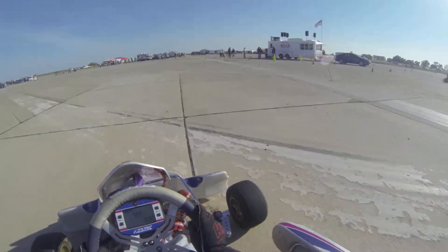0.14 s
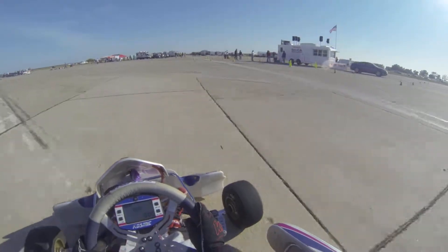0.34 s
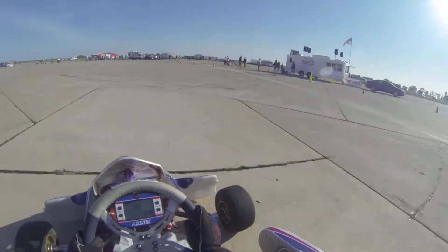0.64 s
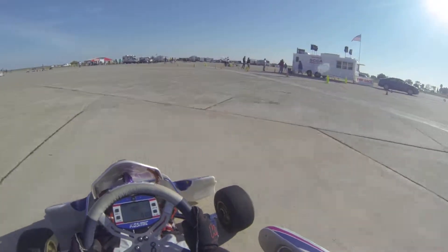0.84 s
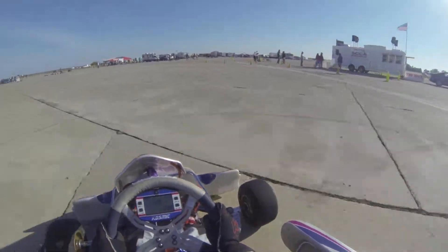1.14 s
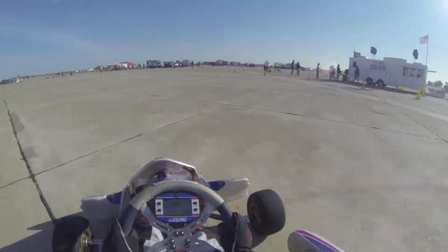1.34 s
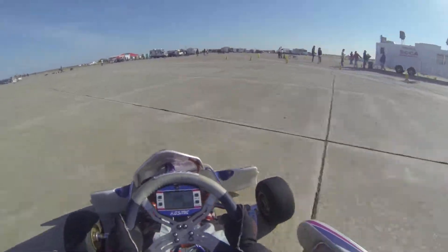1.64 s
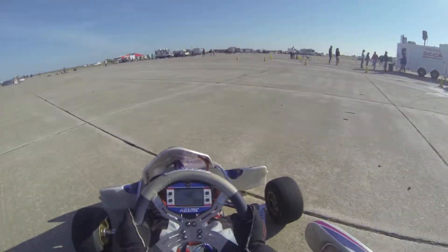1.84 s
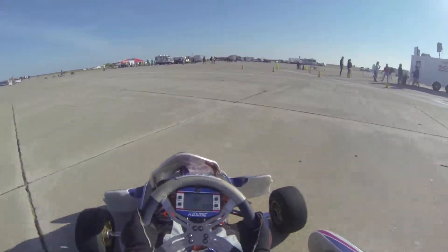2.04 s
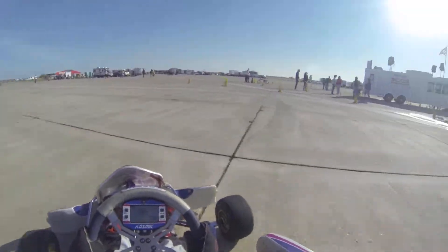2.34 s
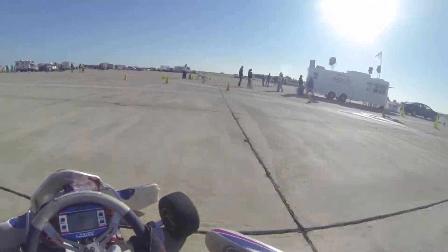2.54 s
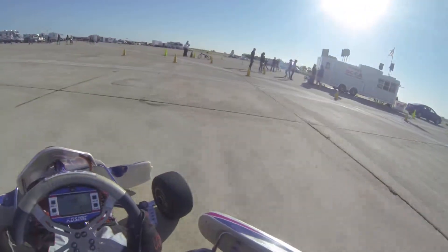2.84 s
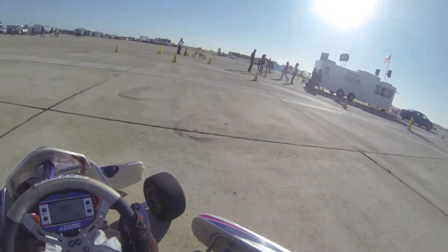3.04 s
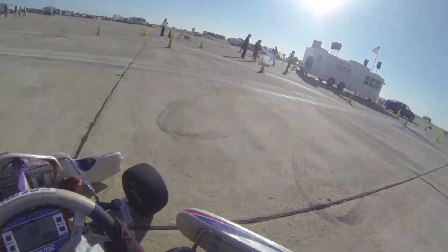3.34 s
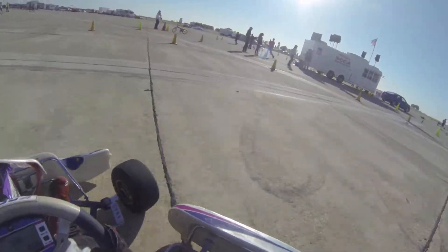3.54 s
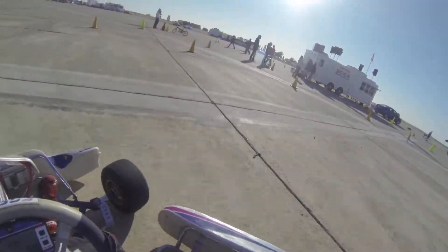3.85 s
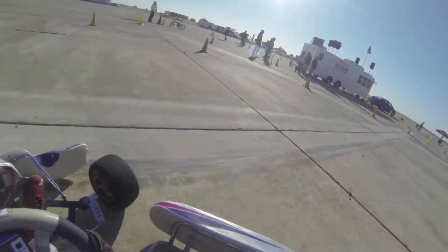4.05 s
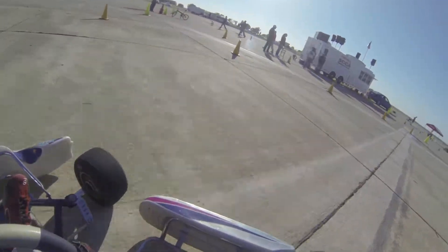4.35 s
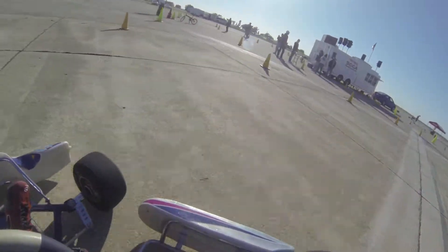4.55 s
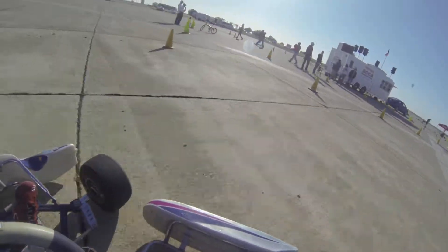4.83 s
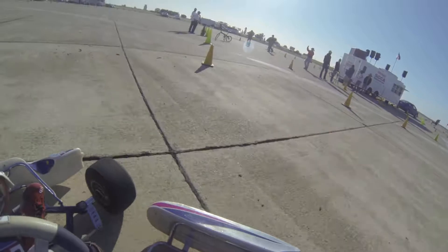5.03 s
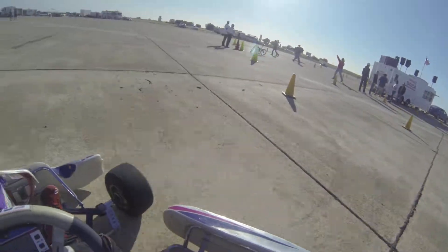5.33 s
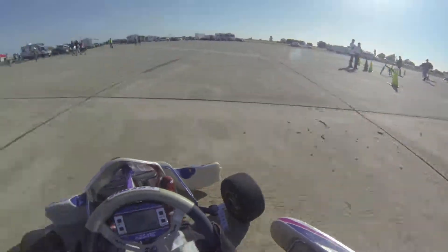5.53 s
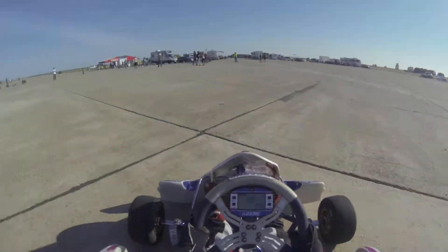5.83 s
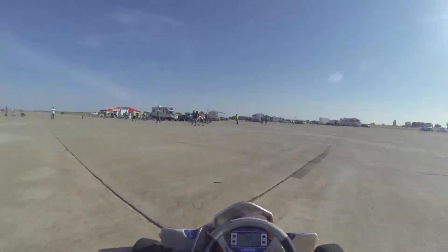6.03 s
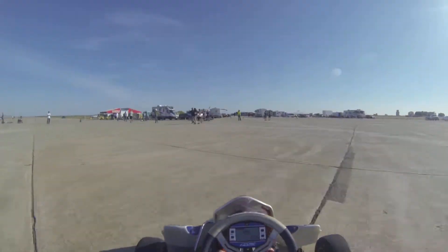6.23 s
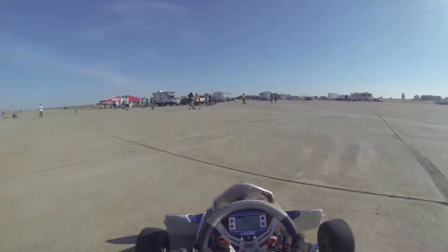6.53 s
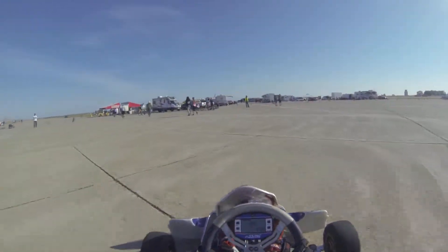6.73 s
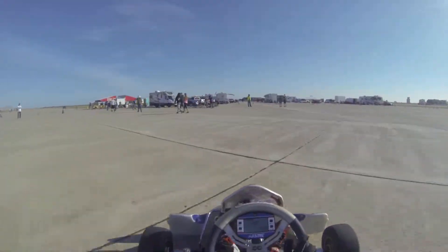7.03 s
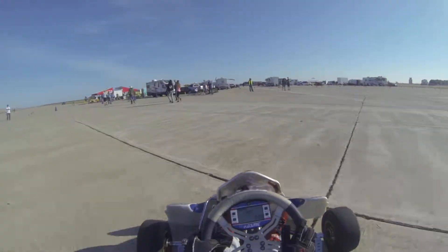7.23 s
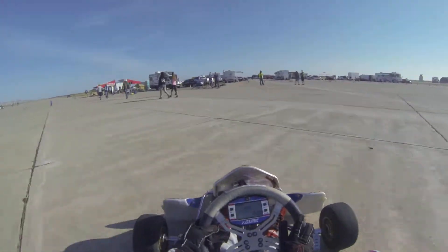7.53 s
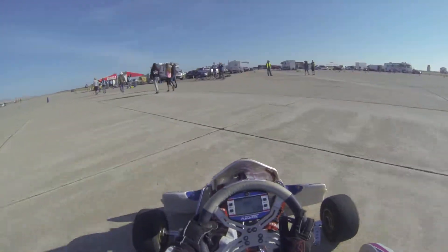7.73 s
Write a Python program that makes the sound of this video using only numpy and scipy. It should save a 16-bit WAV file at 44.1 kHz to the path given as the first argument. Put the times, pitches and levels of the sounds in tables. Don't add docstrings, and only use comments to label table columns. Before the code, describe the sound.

Close onboard sound on open concrete. A small single-cylinder four-stroke kart engine thumps lumpily near idle while chain and valve gear rattle and wind booms around a sealed camera case. Small grit ticks lead to one sharp stone crack past the middle. The throttle then opens into a loud, raspy bark for about a second and a half before easing back to a rattling coast.

```python
import sys
import numpy as np
from scipy import signal
from scipy.fft import rfft, irfft
from scipy.io import wavfile
from scipy.ndimage import uniform_filter1d

SR = 44100
rng = np.random.default_rng(int(sys.argv[2]) if len(sys.argv) > 2 else 0)


def voltage_ratio(decibels):
    exponent = np.asarray(decibels, float) / 20
    return 10 ** exponent


def dump(signal):
    limited = np.clip(np.atleast_2d(signal).T, -1, 1)
    pcm = np.round(limited * 32767).astype(np.int16)
    wavfile.write(sys.argv[1], SR, pcm)


N = 347508

# [t/s, level/dB]
WIND_FACING = [
    (0, 1.5),
    (2.85, 1),
    (3, -5),
    (4.1, -12),
    (4.6, -1),
    (5.2, -9),
    (5.9, -6),
    (6.2, -4.5),
    (7.2, -3),
    (7.88, -0.5),
]
# [t/s, extra buffeting level/dB, extra boom level/dB]
GUSTS = [(.08, 8, 5), (.39, 2, 2.5), (.86, 7, 1), (1.25, 6, 4.5), (1.41, 14.5, 2), (1.55, 6, 2.5),
         (2.06, 7, 0), (2.42, 1, 1.5), (2.55, -3, 3.5), (2.7, -3, 5), (2.86, 5, 1), (4.39, 8, -1.5),
         (4.61, 1, 2), (5.36, 7, 3.5), (5.51, -1, 2), (5.71, 0, 7.5), (6.01, 10, 4.5), (6.21, 13.5, 5.5),
         (6.36, 10, 0), (6.54, 12, -10), (6.74, 15, 2), (6.93, 17, 1), (7.3, 5, 10.5), (7.55, 4.5, 7),
         (7.86, 0, 6)]
# [t/s, dull level/dB, bright level/dB, decay/ms]
GRIT = [(.375, -35, -44, 2), (0.928, -33, -52, 3.5), (1.389, -43, -52, 3), (1.455, -34, -52, 3),
        (4.342, -27, -50, 1.5), (4.423, -36, -49, 1.5), (4.553, -35, -50, 1.5), (4.734, -16, -16.5, 1.2),
        (4.847, -34, -48, 1.5), (5.065, -30, -38, 3), (5.27, -40, -43, 3), (3.09, -42, -43, 4),
        (3.16, -40, -42, 4), (2.76, -42, -40, 4), (2.36, -36, -45, 4), (3.63, -42, -44, 4),
        (5.553, -30, -37, 11), (5.584, -25, -31, 8.8), (5.614, -26, -33, 7.8), (7.311, -24, -50, 2.6),
        (7.336, -29, -51, 5), (7.398, -32, -46, 4.7)]
# [t/s, f/Hz, level/dB, decay/ms]
KNOCKS = [
    (4.733, 1800, -18, .8),
    (4.734, 2950, -11, 1.2),
    (4.734, 3750, -22, 1),
    (7.311, 665, -24, 3),
    (7.311, 1030, -20, 2.2),
    (7.312, 3000, -26, 3.6),
]
# [t/s, extra level/dB, length/s]
LEANS = [
    (0.1, 18, 0.31),
    (0.623, 17, .12),
    (1.803, 16, 0.27),
    (2.208, 14, 0.26),
    (2.82, 13, 0.063),
    (3.548, 19.5, .45),
    (4.55, 17, 0.44),
    (6.08, 8, .1),
    (6.72, 11, 0.14),
    (7.5, 24, .4),
]
# [t/s, level/dB]
CLUTCH_SLIP = [
    (0, -47.5),
    (2, -55),
    (2.6, -47.5),
    (4.5, -40),
    (5.4, -42.5),
    (5.8, -56),
    (7.88, -55),
]
# [t/s, firing rate f/Hz, silencer level/dB]
ENGINE = [(0, 30.3, -29.5), (.46, 29.17, -36.5), (.6, 27.32, -36.5), (1.25, 27.49, -35.5),
          (1.7, 26.3, -39.5), (2., 27.31, -32.5), (2.6, 27.38, -35.5), (3.01, 28.29, -31.5),
          (3.47, 29.28, -30.5), (4.4, 30.61, -29.5), (5.2, 31.17, -30), (5.48, 30.56, -31),
          (5.71, 37.32, -24.5), (5.82, 38.46, -23.5), (6.05, 39.07, -25.5), (6.82, 38.24, -25),
          (7.07, 33.94, -25), (7.4, 32.01, -27)]

# [f/Hz, level/dB]
CHUFF = [(397, 190, 18), (635, 43, 1)]
CHUFF_SLOPE = [(60, -17), (170, -38), (240, -16), (750, -44), (950, 3.5), (2000, -63)]
FRAME = [(1428, 157, 3.5), (1617, 268, -4.5), (2201, 153, -1), (2790, 61, -14.5), (3150, 530, -17),
         (3953, 350, -12), (5150, 176, -28.5), (10000, 280, -31)]
FRAME_SLOPE = [(200, -15), (700, -11.5), (1000, -13.5), (2500, -12.5), (4500, -19.5), (7500, -25.5),
               (10500, -34.5), (15500, -38)]
DRUM = [(3220, 200, 4), (5170, 110, 4), (6750, 300, -4), (9100, 1100, -11), (12000, 900, -25),
        (14200, 400, -33)]
DRUM_SLOPE = [(2000, -50), (4500, -18), (7700, -26), (11000, -34), (15500, -48)]
TAILPIPE = [(620, 110, 0)]
TAILPIPE_SLOPE = [(200, -40), (1500, -40)]
CRACK = [(297, 90, -1.5), (650, 120, -7.5), (1040, 45, -5.5), (1248, 115, -3), (1385, 83, 2), (1500, 59, 7),
         (1694, 110, -1), (2113, 120, 3.5), (3100, 590, -12), (3827, 80, -9)]
CRACK_SLOPE = [(150, -78), (850, -14.5), (1300, -13), (2500, -21), (4500, -28), (9000, -60)]
BARK = [(1470, 310, -1), (1680, 130, -6), (2202, 110, -1), (2980, 280, -14), (3950, 340, -19)]
BARK_SLOPE = [(200, -82), (1000, -15), (1300, -16.5), (2600, -16.5), (4500, -26), (7000, -33), (11700, -43),
              (15500, -57)]
SILENCER = [(72, 200, -8.5), (110.6, 135, -1), (169.8, 16.4, 1), (188.5, 18, 1.5), (405, 81, -4),
            (535, 42, -19), (620, 113, -8), (719.4, 43, -6)]
SILENCER_SLOPE = [(20, -22), (200, -22), (260, -27), (760, -27), (820, -33), (1100, -32), (1500, -40),
                  (3000, -70)]
# [f/Hz, level/dB]
HISS_SLOPE = [(2000, -12.5), (4300, 0), (5800, -7), (7500, -9.5), (11800, -18), (15500, -20)]
# [f/Hz, width/Hz, share removed/0-1]
CASE_DIPS = [(6050, 310, 0.46), (8180, 2700, 0.46), (10400, 1700, 0.32), (13200, 1300, 0.6),
             (14900, 2000, 0.8)]

OPENS_S, OPENING_S, SHUTS_S, SHUTTING_S = 5.42, 0.21, 6.874, 0.49
IDLE_HZ = 27
FIRING_AT_S = 6.1645


def unit(x):
    return x / np.sqrt(np.mean(x ** 2))


def noise():
    return rng.standard_normal(N)


def track(table):
    s, *columns = np.transpose(table)
    return [np.interp(np.arange(N) / SR, s, c) for c in columns]


def body(x, modes, slope, echo_ms=1., echo=0.):
    size = 2 ** 13
    hz = np.arange(size // 2 + 1) * SR / size + 1e-3
    slope_hz, slope_db = np.transpose(slope)
    gain = voltage_ratio(np.interp(np.log(hz), np.log(slope_hz), slope_db))
    for centre, width, db in modes:
        gain = gain + voltage_ratio(db) / (1 + ((hz - centre) / width) ** 2 * 2) ** 2
    cepstrum = irfft(np.log(gain))
    cepstrum[1:size // 2] *= 2
    cepstrum[size // 2 + 1:] = 0
    lag = np.exp(-2j * np.pi * hz * echo_ms / 1000)
    all_pass = (lag - echo) / (1 - echo * lag)
    response = irfft(np.exp(rfft(cepstrum)) * all_pass)
    return unit(signal.oaconvolve(x, response)[:N])


def band(x, lo_hz, hi_hz):
    return unit(signal.sosfilt(signal.butter(2, [lo_hz, hi_hz], "band", fs=SR, output="sos"), x))


def walk(rate):
    k = int(SR / rate)
    held = np.repeat(rng.standard_normal(N // k + 1), k)
    return unit(uniform_filter1d(uniform_filter1d(held, k), k)[:N])


def steady(x):
    return x / np.sqrt(uniform_filter1d(x ** 2, SR // 3))


def swells(s, db, length_s):
    t = np.arange(0, N, 64)[:, None] / SR
    lift_db = np.sum(db * np.exp(-((t - s) / length_s) ** 2), axis=1)
    return np.repeat(lift_db, 64)[:N]


def puffs(cycles, at, length, scatter_db, wander):
    chance = rng.standard_normal((400, 2))
    turn = np.floor(cycles - at).astype(int)
    late = wander * np.abs(chance[turn, 0])
    since = np.maximum(cycles - at - turn - late, 0) / length
    return voltage_ratio(scatter_db * chance[turn, 1]) * since * np.exp(1 - since)


def throttle():
    t = np.arange(N) / SR
    opening = (t - OPENS_S) / OPENING_S
    shutting = 1 - (t - SHUTS_S) / SHUTTING_S
    return np.clip(np.minimum(opening, shutting), 0, 1)


def wind():
    s, lift_db, ring_db = np.transpose(GUSTS)
    gust_s = 0.066
    facing_db = track(WIND_FACING)[0]
    buffet_db = -27.5 + facing_db + swells(s, lift_db, gust_s) + 2.5 * walk(3.9)
    boom_db = -26.5 + 0.53 * facing_db + swells(s, ring_db, gust_s)
    buffet = band(band(noise(), 4.4, 25.2), 5.4, 57.0)
    note_hz = 105. + 3. * walk(30)
    boom = unit(voltage_ratio(0.97 * walk(18)) * np.sin(2 * np.pi * np.cumsum(note_hz) / SR))
    gust = steady(band(noise(), 88.7, 118.3))
    rumble = band(noise(), 49.0, 139.6)
    cavity = voltage_ratio(-4) * boom + voltage_ratio(-4.5) * gust + voltage_ratio(-7.5) * rumble
    return voltage_ratio(buffet_db) * buffet + voltage_ratio(boom_db) * cavity


def grit():
    dull, bright = np.zeros(N), np.zeros(N)
    ms = np.arange(1200) / SR * 1000
    for s, dull_db, bright_db, decay_ms in GRIT:
        i = int(s * SR)
        decay = np.exp(-ms / decay_ms)
        dull[i:i + len(ms)] += voltage_ratio(dull_db + 7.5) * decay
        bright[i:i + len(ms)] += voltage_ratio(bright_db + 5.5) * decay
    out = np.zeros(N)
    for shape, edges_hz in ((dull, [750., 4800.]), (bright, [6000., 10800.])):
        sos = signal.butter(3, edges_hz, "band", fs=SR, output="sos")
        out += signal.sosfilt(sos, shape * noise())
    return out


def knocks():
    out, ms = np.zeros(N), np.arange(1200) / SR * 1000
    for s, hz, db, decay_ms in KNOCKS:
        i = int(s * SR)
        ring = np.sin(2 * np.pi * hz * ms / 1000)
        out[i:i + len(ms)] += voltage_ratio(db) * np.exp(-ms / decay_ms) * ring
    return out


def chuff(cycles, revs):
    throb = (.5 + puffs(cycles, 0., 0.48, 2.0, 0.035)) * voltage_ratio(2. * walk(12))
    return voltage_ratio(-45.5 - .3 * revs) * body(throb * noise(), CHUFF, CHUFF_SLOPE)


def seat_shake(cycles):
    shake_db = -45.5 + swells(*np.transpose(LEANS)) + 1.5 + 1.5 * walk(10)
    return voltage_ratio(shake_db) * np.sin(4 * np.pi * cycles)


def chain_slaps(cycles):
    first = puffs(cycles, 0.59, 0.076, 3.2, 0.082)
    second = 0.6 * puffs(cycles, 0.098, 0.16, 2.3, 0.12)
    slack = 0.67 * (1 - throttle()) * puffs(cycles, 0.85, 0.097, 0.67, 0.064)
    return first + second + slack


def chain_guard(slaps, revs):
    slack_db = 9 * (np.arange(N) / SR > SHUTS_S + SHUTTING_S)
    guard_db = np.minimum(-55 + 2.4 * revs, -47) + slack_db
    return voltage_ratio(guard_db) * band((1.4 + slaps) * noise(), 2667.0, 2860.0)


def clutch_drum(cycles, slaps):
    jolts = puffs(cycles / 2 + 1, 0.4, 0.093, 1.2, 0.076)
    rub = steady((1.0 + .5 * slaps + 1.9 * jolts) * voltage_ratio(3.0 * walk(11)))
    return voltage_ratio(track(CLUTCH_SLIP)[0]) * body(rub * noise(), DRUM, DRUM_SLOPE)


def frame(slaps, revs):
    rattle_db = np.minimum(-30 + 0.57 * revs, -25.5) - 4 * throttle() ** 2
    grind = 0.7 - 0.13 * throttle()
    rattle = steady((grind + slaps) * voltage_ratio(0.64 * walk(14)))
    return voltage_ratio(rattle_db) * body(rattle * noise(), FRAME, FRAME_SLOPE)


def tailpipe(pulses):
    cooling_s = np.maximum(np.arange(N) / SR - SHUTS_S - SHUTTING_S, 0)
    heat = np.maximum.accumulate(throttle()) * voltage_ratio(-43 - 3 * cooling_s)
    return -heat * body(pulses, TAILPIPE, TAILPIPE_SLOPE, echo_ms=4.5, echo=.68)


def intake(cycles):
    return band(puffs(cycles, .5, .075, 3., .03) * noise(), 1350., 1700.)


def bark(cycles, pulses):
    shut_db, open_db = -44, -21.5
    rush = .035 + puffs(cycles, .0, .055, 1.8, .01)
    gas = body(rush * noise(), BARK, BARK_SLOPE)
    crack = throttle() * body(pulses, CRACK, CRACK_SLOPE, echo_ms=2.3, echo=.78)
    hiss = body((3.3 + rush) * noise(), [], HISS_SLOPE)
    mix = voltage_ratio(-2.5) * gas + voltage_ratio(-1) * crack + voltage_ratio(-8) * intake(cycles) + voltage_ratio(-15.0) * hiss
    load = voltage_ratio(shut_db + (open_db - shut_db) * throttle())
    return mix * load * (throttle() > 0)


def firings(cycles, lope_db):
    turn = np.floor(cycles).astype(int)
    uneven = .85 * (-1.) ** turn + .35 * rng.standard_normal(400)[turn]
    return unit(np.diff(turn, prepend=turn[0]) * voltage_ratio(lope_db * uneven))


def exhaust(pulses, note_db):
    return body(pulses, SILENCER, SILENCER_SLOPE, echo_ms=4.5, echo=.68) * voltage_ratio(note_db)


def scene():
    hz, note_db = track(ENGINE)
    revs = hz - IDLE_HZ
    lope_db = np.maximum(4.2 - .9 * revs, .5)
    cycles = np.cumsum(hz * (1 + .004 * lope_db * walk(12))) / SR
    cycles = cycles + 2 - (cycles[int(FIRING_AT_S * SR)] % 1)
    pulses = firings(cycles, lope_db)
    slaps = chain_slaps(cycles)
    case = wind() + grit() + knocks()
    kart = chuff(cycles, revs) + seat_shake(cycles)
    drive = chain_guard(slaps, revs) + clutch_drum(cycles, slaps) + frame(slaps, revs)
    engine = tailpipe(pulses) + bark(cycles, pulses) + exhaust(pulses, note_db)
    return (case + kart + drive + engine)[None]


def band_limit(x):
    return signal.sosfilt(signal.butter(12, 15270, fs=SR, output="sos"), x)


def record(dry):
    for hz, width, share in CASE_DIPS:
        peak = signal.lfilter(*signal.iirpeak(hz, hz / width, fs=SR), dry)
        dry = dry - share * peak
    dry = signal.sosfilt(signal.butter(1, 3, "high", fs=SR, output="sos"), dry)
    mix = signal.sosfilt(signal.ellip(8, .2, 70, 15250, fs=SR, output="sos"), dry)
    return band_limit(mix)


dry = scene()
out = record(dry)
dump(out)
```